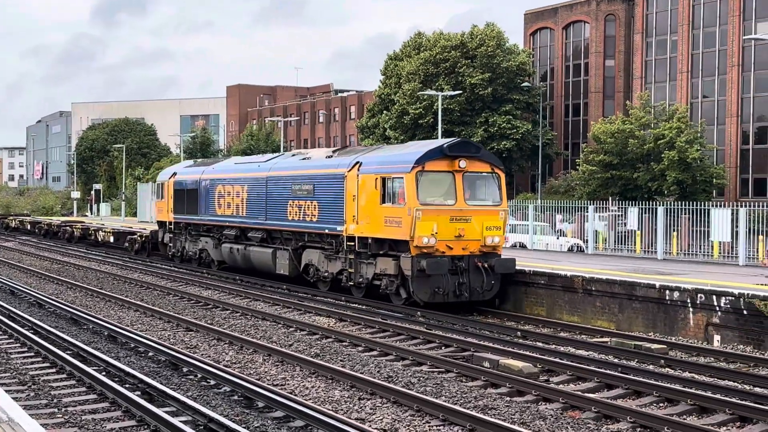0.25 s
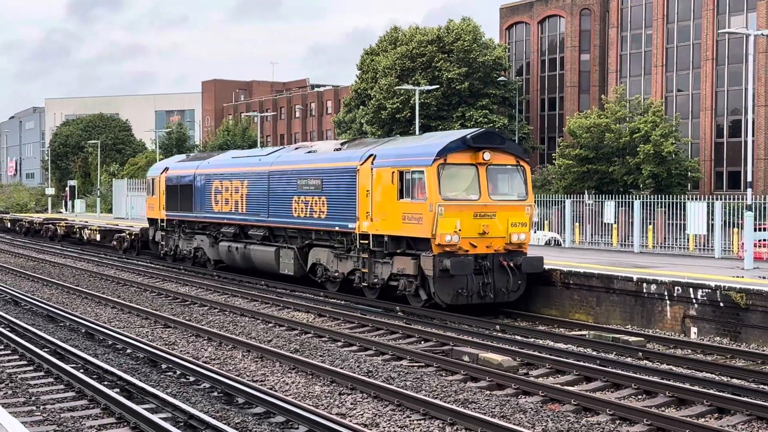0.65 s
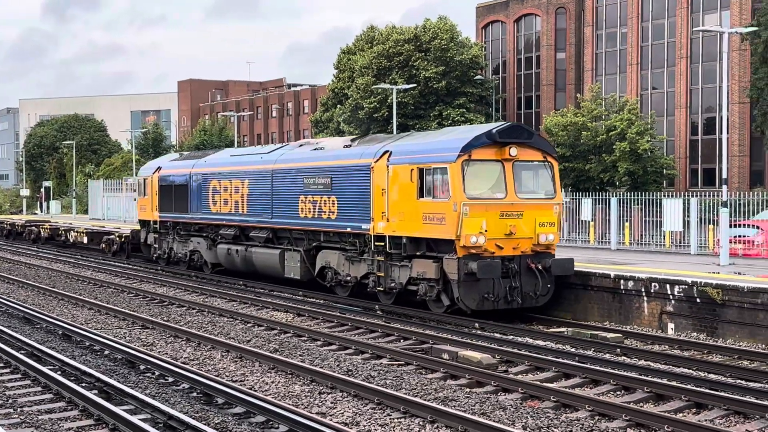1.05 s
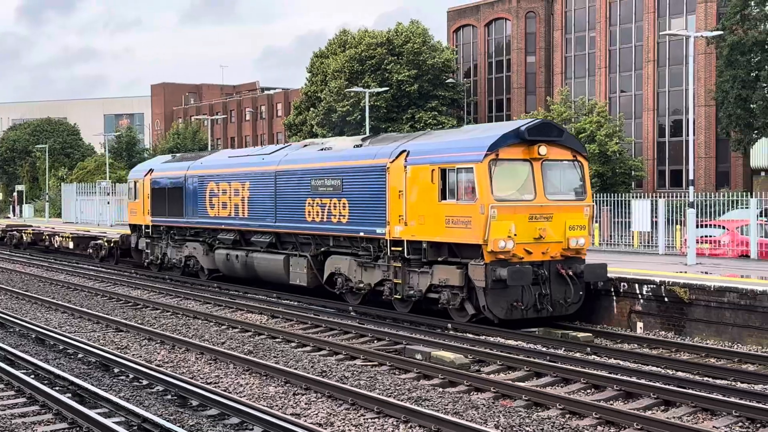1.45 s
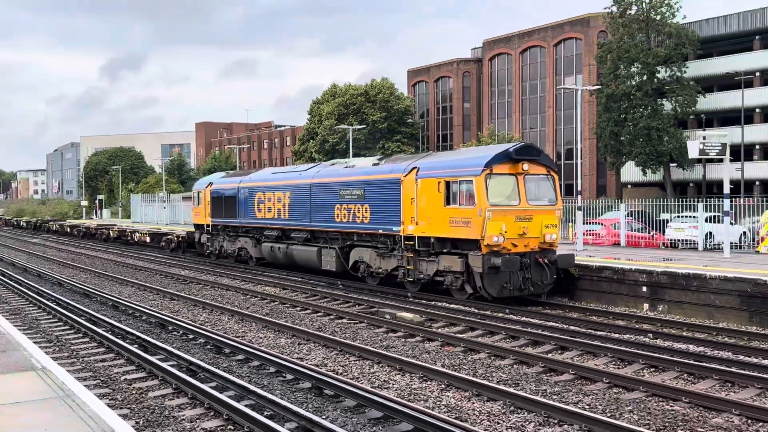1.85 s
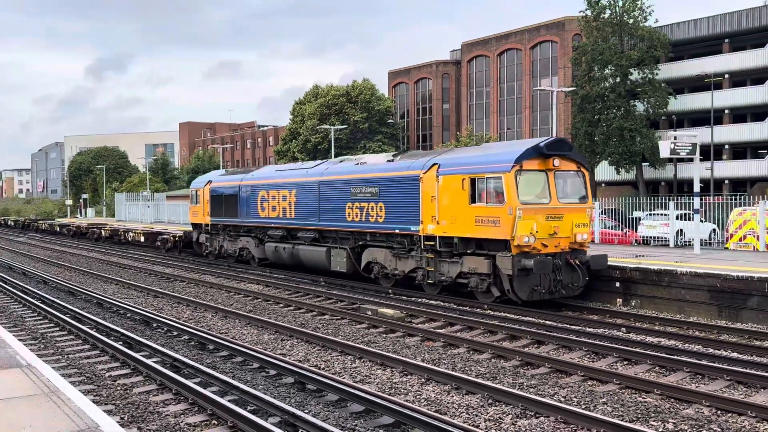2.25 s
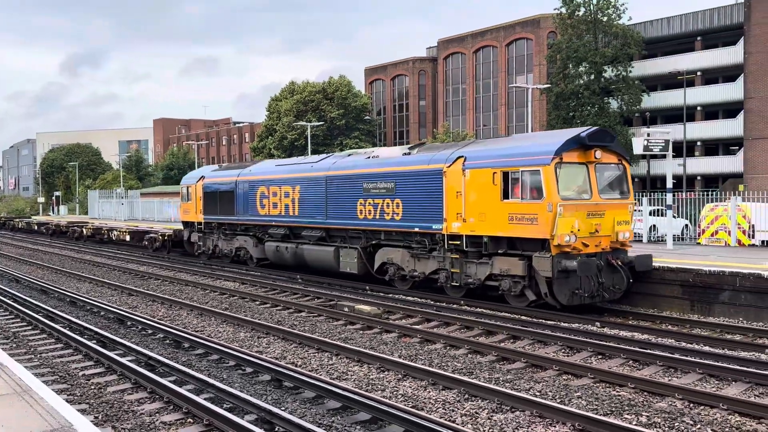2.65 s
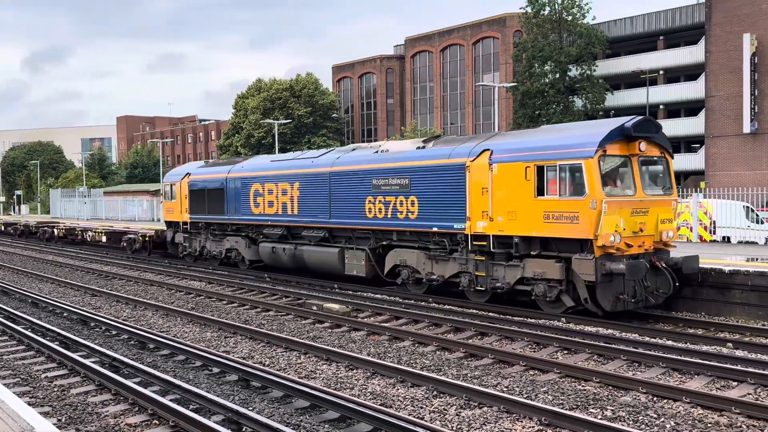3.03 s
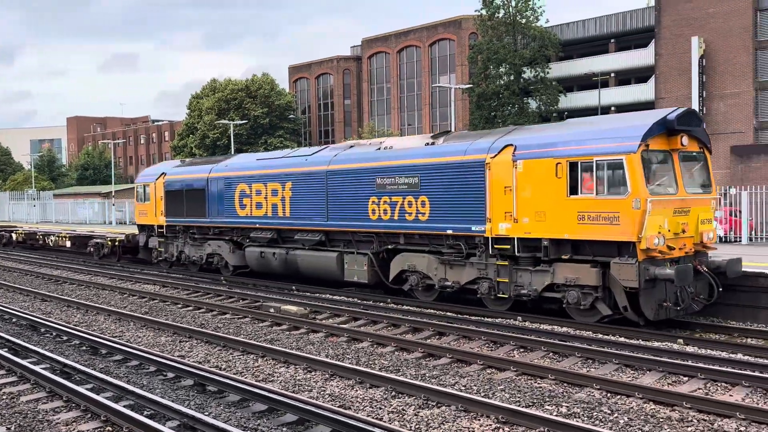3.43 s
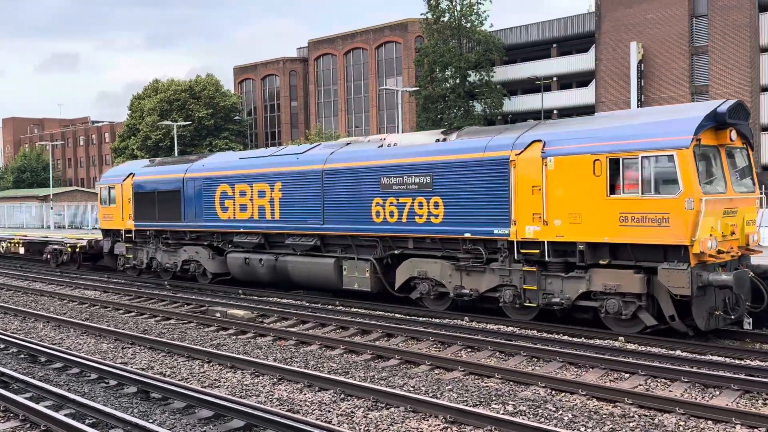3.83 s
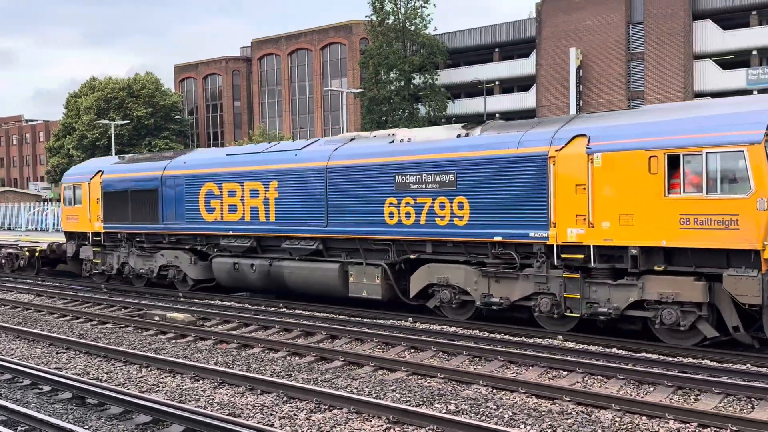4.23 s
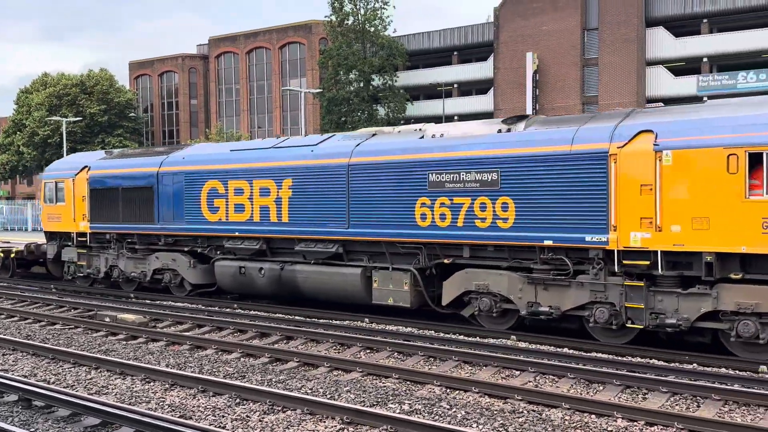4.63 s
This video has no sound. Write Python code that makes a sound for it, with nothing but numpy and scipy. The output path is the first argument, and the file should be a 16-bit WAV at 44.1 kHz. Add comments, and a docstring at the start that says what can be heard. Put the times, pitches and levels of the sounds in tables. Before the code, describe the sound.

A big diesel locomotive rolls slowly toward a microphone on an open station platform, a few tracks away. From 0 s there is a deep, steady exhaust throb, about nine soft thumps a second, bedded in a dark, broad roar of fans and exhaust air. Brief, thin metallic chirps, like a dry rubbing part, squeak irregularly on top. Around 1 s a low gear hum swells in; it comes and goes in uneven surges, strongest from about 2.4 s, and its pitch creeps upward. Fluttering mid-range gear whines and a rattly casing drone thicken from about 1.4 s. After 3 s the chirps include more of the higher squeaks, short singing gear notes appear, especially after 4 s, and a rough, faint blower whistle emerges. Clatter and light hiss increase as the engine room nears. The sound is fullest at the end, near 4.9 s, still running when it stops. The image is nearly central.

```python
"""A two-stroke V12 diesel locomotive idles toward a platform, a few tracks away.
First: exhaust throb on crankshaft orders, noise-band air roar, chirps from a part that rubs as it turns.
From about 1 s a traction gear tone swells in, climbing slowly; fluttering engine-gear harmonics follow.
From about 3 s the 4th gear harmonic sings in short notes, then a blower whistle stands out.
Most layers grow to the end as the engine room draws near; faint top-band noise is uneven in level."""
import sys
import numpy as np
from scipy import signal
from scipy.fft import rfft, irfft
from scipy.io import wavfile

SR = 44100
rng = np.random.default_rng(int(sys.argv[2]) if len(sys.argv) > 2 else 0)


def output_pcm(signal):
    """Save a mono or channel-first signal as 16-bit PCM at the path in sys.argv[1].

    Samples are clipped to [-1, 1] before scaling.
    """
    pcm = np.clip(np.atleast_2d(signal).T, -1, 1) * 32767
    wavfile.write(sys.argv[1], SR, np.round(pcm).astype(np.int16))


N = 215405
TIME = np.arange(N) / SR
FREQS = np.fft.rfftfreq(N, 1 / SR)

SPEED_M_S, TRACK_M, ABREAST_S = 5.5, 7.9, 5.4  # approach, distance to the track, engine room level
GRILLE_POWER = 1.93  # side grilles face sideways: their sound grows as nearness to this power
CRANK_HZ, CRANK_SAG_HZ_PER_S, CRANK_AT_S = 4.523, .0026, 2.8  # crank rate at CRANK_AT_S, and its fall
THUMP_S = .0375  # a thump falls about here
CHIRP_RATE_HZ, CHIRP_CREST_S = 6.18, 2.1
WHISTLE_HZ, WHINE_HZ = 4254, 357.7
CASING_HZ, CASING_WIDTH_HZ = 706, 26
MESH_HZ, MESH_RISE_HZ_PER_S = 226.8, 4.45
TOP_HZ = 15600

# Rubbing tones. Each row: frequency in Hz, far and near level in dB before the rub trim.
RUB_TONES = [(2330, -64, -65), (3712, -67, -60), (4616, -67.5, -64)]
# Loudest chirps. Each row: time in seconds, frequency in Hz, level in dB before the bite trim, length in seconds.
BITES = [(0.213, 2336, -44, 0.023), (0.56, 2325, -54, .025), (0.693, 2329, -43, 0.025),
         (0.844, 2335, -40, 0.019), (1.178, 2290, -47, 0.016), (1.31, 2320, -41, 0.014),
         (1.41, 2337, -43, 0.03), (1.457, 2360, -47, 0.018), (1.644, 2325, -40, 0.017),
         (1.823, 2330, -40, 0.026), (2.01, 2338, -51, 0.018), (2.632, 2320, -37, 0.026),
         (2.973, 2310, -55, 0.011), (3.22, 2290, -39, 0.017), (3.344, 2316, -38, 0.033),
         (3.416, 2334, -45, 0.019), (3.57, 2330, -37.5, 0.014), (4.28, 2326, -47, .035),
         (4.36, 2331, -47, .018), (4.517, 2326, -40, .02), (4.707, 2322, -38, 0.033),
         (4.872, 2317, -44, .015), (0.3, 4613, -55, .012), (0.494, 4616, -54, .015),
         (0.804, 4602, -53, .02), (1.004, 4616, -55, 0.02), (1.295, 4618, -55, .02),
         (1.63, 4621, -53, 0.044), (2.45, 4614, -50, .03), (2.593, 4607, -54, .03),
         (2.75, 4617, -49, 0.026), (2.8, 4700, -47, 0.01), (2.93, 4653, -55, .025),
         (3.12, 4613, -41.5, 0.031), (3.243, 4603, -51, .016), (3.37, 4614, -48, 0.023),
         (3.44, 4612, -47, 0.013), (3.56, 4612, -44, 0.024), (3.741, 4647, -48, 0.022),
         (3.809, 4597, -54, .015), (3.882, 4615, -49, .027), (4.08, 4580, -42.5, 0.024),
         (4.212, 4623, -44, 0.02), (4.396, 4680, -50, .028), (4.563, 4540, -55, .014),
         (4.705, 4618, -49, 0.022), (4.875, 4620, -42, 0.022)]
# Blower whistle. Each row: time in seconds, level in dB.
WHISTLE_LEVEL_DB = [(0, -69), (1.6, -68), (2.0, -64.5), (2.4, -64.5), (2.7, -66), (3.2, -65), (3.6, -60.5),
                    (4.1, -57), (4.38, -60.5), (4.6, -57), (4.88, -59.5)]
# Steady machinery tones. Each row: frequency in Hz, far and near level in dB,
# flutter as a ratio to the steady part, flutter rate in Hz.
MACHINE_TONES = [(357.7, -47, -46, .4, 10), (407, -57, -45, .6, 10), (433, -54, -44, .9, 15),
                 (543, -54, -44, .6, 10), (1589, -63, -54, .9, 15), (1788, -60, -52.5, .7, 8),
                 (2333, -55, -53.5, .7, 50), (2685, -75, -61, 1.5, 40), (3185, -69, -59.5, 1, 30),
                 (4612, -65.5, -60.5, 1.3, 60)]
# Engine gear harmonics 2, 3 and 4, in lobes that sweep past. Each row: time in seconds, level in dB.
WHINE_2_DB = [(0, -56), (.9, -51), (1.4, -45), (2.3, -41.5), (2.7, -45), (3.0, -41), (3.4, -41),
              (4.3, -40.5), (4.65, -38.5), (4.88, -41)]
WHINE_3_DB = [(0, -56), (.7, -51), (1.1, -52), (1.8, -47), (2.3, -46), (2.8, -46.5), (3.48, -49.5),
              (3.56, -41), (3.9, -41), (4.08, -44), (4.16, -53), (4.55, -51), (4.66, -42.5), (4.88, -42)]
WHINE_4_DB = [(0, -56), (2.7, -55), (3.5, -55.5), (3.95, -54), (4.23, -52.5), (4.7, -52), (4.88, -53)]
# Backlash roughness. Each row: harmonic number, flutter as a ratio to the steady part, flutter rate in Hz.
GEAR_BACKLASH = [(2, .5, 14), (3, .22, 14), (4, .3, 24)]
# Short notes of the 4th harmonic. Each row: time in seconds, level in dB, length in seconds.
SUNG_NOTES = [(1.293, -53, .03), (2.93, -50, .04), (3.235, -48.5, .03), (3.873, -53, .02),
              (4.052, -42.5, .037), (4.23, -45.5, .04), (4.37, -45, .052), (4.53, -46, .05),
              (4.716, -42.5, .032)]
# Casing drone. Each row: time in seconds, level in dB.
CASING_LEVEL_DB = [(0, -55), (1.0, -51), (1.4, -44.5), (2.6, -43.5), (3.1, -40.5), (4.88, -40.5)]
# Traction gear hum. Each row: time in seconds, level in dB.
MESH_LEVEL_DB = [(0, -44.5), (.65, -45.5), (.95, -37), (1.25, -41.5), (1.5, -46), (1.8, -39.5),
                 (2.08, -37.5), (2.2, -41), (2.41, -29.5), (2.54, -37), (2.65, -35.5), (2.76, -39.5),
                 (2.88, -34), (3.12, -36.5), (3.45, -30.5), (3.66, -28.5), (3.8, -35), (3.95, -27.5),
                 (4.15, -34), (4.32, -28), (4.55, -39.5), (4.8, -34)]
# Noise colours: roof roar, side-grille roar, clatter, hiss, top band.
# Each row: frequency in Hz, relative density in dB per Hz.
ROOF_COLOUR = [(22, -31), (35, -6), (70, 7), (110, 2), (150, -2.5), (200, 1.5), (245, 2), (300, -1.5),
               (380, -2), (470, -1), (600, -3), (690, -2), (900, -6), (1100, -9), (1600, -24.5),
               (3000, -65)]
SIDE_COLOUR = [(22, -24), (35, -5), (75, 6), (115, 2.5), (160, 0), (200, 2), (245, 2.5), (310, 0),
               (370, -3.5), (430, 0.5), (520, 1), (660, 2.1), (790, -6.5), (1100, -15.5), (1600, -30.5),
               (3000, -59)]
CLATTER_COLOUR = [(500, -41), (900, 1.5), (1200, 4.5), (1550, 3), (1900, 0), (2400, -3), (3000, -5.5),
                  (4000, -10), (5000, -20.5), (7000, -44)]
HISS_COLOUR = [(2500, -27.5), (4200, 6.5), (5200, 2.5), (7000, 2.5), (8300, -2.5), (9400, -2), (10300, 0),
               (12000, -14.5), (14000, -36)]
TOP_BAND_COLOUR = [(9000, -19), (11500, 6.5), (14300, -4.5), (15600, -14)]
# Top-band noise. Each row: time in seconds, level in dB.
TOP_BAND_LEVEL_DB = [(0, -70), (.3, -70), (.44, -68), (.75, -74), (1.2, -79), (2.0, -73.5), (3.05, -77),
                     (3.35, -69), (3.52, -72), (3.7, -67), (3.98, -73), (4.15, -67), (4.6, -70),
                     (4.88, -67)]
# Diffuse share of the air noise. Each row: frequency in Hz, side minus mid in dB.
AIR_WIDTH = [(60, -20.5), (110, -17), (200, -14), (400, -13), (700, -8.5), (1300, -6.5), (2300, -27),
             (3300, -41), (5300, -51), (9000, -56), (14000, 0)]
# Weaker exhaust orders. Each row: multiple of the crank rate, far and near level in dB.
RUMBLE_ORDERS = [(6, -52, -47), (7, -57, -52), (10, -43, -44), (12, -52, -51), (13, -54, -51),
                 (14, -46, -50), (16, -55, -42), (18, -48, -40), (19, -47, -40.5), (22, -56, -55),
                 (23, -54, -53), (24, -56, -53), (26, -52, -49), (30, -49, -47), (32, -53, -52),
                 (33, -56, -52), (36, -51, -52), (38, -53, -53), (39, -54, -46)]
# Orders beating with the 9th and 15th twice a turn. Each row: multiple of the crank rate, far and near level in dB.
THROB_ORDERS = [(11, -36.8, -38.5), (13, -40, -80), (17, -39, -37.5)]
# Deep 9th exhaust order. Each row: time in seconds, level in dB.
ORDER_9_DB = [(0, -38), (0.35, -37), (0.8, -31.5), (2.0, -35), (3.4, -33.5), (4.4, -27), (4.88, -29)]
# Strongest exhaust order, the 15th; dips where an echo cancels it. Each row: time in seconds, level in dB.
ORDER_15_DB = [(0, -29), (.25, -28), (.5, -33.5), (.92, -26.5), (1.45, -25), (1.62, -23.3), (2.0, -23),
               (2.3, -21.8), (2.7, -24), (3.08, -25.5), (3.21, -34.5), (3.4, -28), (3.64, -24), (3.8, -26),
               (4.0, -23.3), (4.3, -24.3), (4.66, -26), (4.76, -31), (4.88, -25)]
# Two microphone ports. Each row: frequency in Hz, left lead in radians, left minus right in dB.
MIC_PORTS = [(300, 0, .5), (700, .15, 1.7), (1200, -.4, 1.1), (2000, 0, 0), (3000, .4, 0), (4650, .28, 0),
             (5300, 0, 0), (6200, 0, 0), (6700, .45, 0), (7250, 1.25, 0), (7550, 2, 0), (7750, 3.05, 0),
             (9000, 3.12, 0), (9300, 2.75, 0), (9800, 2.5, 0), (10400, 2.2, 0), (12200, 1.7, 0),
             (14600, .3, 0)]


def undb(db):
    """Decibels to gain."""
    return 10 ** (np.asarray(db) / 20)


def unit(x):
    """Scale to rms 1."""
    return x / np.sqrt(np.mean(np.abs(x) ** 2))


def curves(table):
    """Columns of a time table, one value a sample."""
    s, *columns = np.transpose(table)
    return [np.interp(TIME, s, c) for c in columns]


def spectra(table):
    """Columns of a frequency table, one value a bin, on a log frequency axis."""
    hz, *columns = np.transpose(table)
    return [np.interp(np.log(FREQS + 1), np.log(hz), c) for c in columns]


def noise(gain):
    """Noise of rms 1 with the given gain per bin."""
    return unit(irfft(rfft(rng.standard_normal(N)) * gain, N))


def walk(rate_hz):
    """Smooth random signal of rms 1, changing about rate_hz times a second."""
    return noise(1 / (1 + (FREQS / rate_hz) ** 2))


def stereo(mid, side):
    """Left and right from mid and side."""
    return np.array([mid + side, mid - side])


def bump(s, db, length_s):
    """Short smooth rise and fall of gain."""
    return undb(db) * np.exp(-((TIME - s) / length_s) ** 2)


def nearness():
    """0 at the start to 1 at the closest; follows the log of distance, as level does."""
    closeness = -np.log(np.hypot(TRACK_M, SPEED_M_S * (TIME - ABREAST_S)))
    return (closeness - closeness.min()) / np.ptp(closeness)


def approach(near, far_db, near_db):
    """Gain that goes from far level to near level."""
    return undb(far_db + near * (near_db - far_db))


def tone(hz, flutter, flutter_hz, side_db):
    """Tone of rms near 1: steady direct part plus fluttering reflections from house fronts."""
    carrier = np.exp(2j * np.pi * np.cumsum(hz * np.ones(N)) / SR)
    mid, side = (unit(walk(flutter_hz) + 1j * walk(flutter_hz)) for _ in range(2))
    envelope = stereo(unit(1 + flutter * mid), undb(side_db) * side)
    return np.sqrt(2) * np.real(carrier * envelope)


def air(colour):
    """Stereo noise of the given colour, mid of rms 1, partly diffuse."""
    gain, width = undb(spectra(colour)[0]), undb(spectra(AIR_WIDTH)[0])
    share = np.sqrt(np.sum((gain * width) ** 2) / np.sum(gain ** 2))
    return stereo(noise(gain), share * noise(gain * width))


def top_band_noise():
    """Faint top-band noise, level uneven."""
    return air(TOP_BAND_COLOUR) * undb(curves(TOP_BAND_LEVEL_DB)[0])


def chirping(near, rub_db=2.5, bite_db=-4.8):
    """A part rubs once a turn and rings high; now and then it bites harder."""
    turn = np.cos(2 * np.pi * CHIRP_RATE_HZ * (TIME - CHIRP_CREST_S))
    rub = unit(1 + (.25 + .45 * near) * turn)
    ring = sum(approach(near, far_db, near_db) * tone(hz, flutter=6.1, flutter_hz=40, side_db=-36)
               for hz, far_db, near_db in RUB_TONES)
    waver_turns = np.cumsum(18 * walk(60)) / SR  # pitch wavers by 18 Hz rms
    bites = np.sqrt(2) * sum(bump(s, db, length_s) * np.sin(2 * np.pi * (hz * TIME + waver_turns))
                             for s, hz, db, length_s in BITES)
    return undb(rub_db) * rub * ring + undb(bite_db) * bites


def whistle():
    """Rough blower whistle that comes out as the side grilles draw near."""
    return undb(curves(WHISTLE_LEVEL_DB)[0]) * tone(WHISTLE_HZ, flutter=.8, flutter_hz=45, side_db=-24)


def machine_tones(near):
    """Steady machinery tones, among them the 1st and 5th engine gear harmonics."""
    return sum(approach(near, far_db, near_db) * tone(hz, flutter, flutter_hz, side_db=-34.5)
               for hz, far_db, near_db, flutter, flutter_hz in MACHINE_TONES)


def engine_gears():
    """Tooth harmonics 2 to 4 of the engine's gear train, rough with backlash."""
    second, third, fourth = (undb(curves(level)[0]) for level in (WHINE_2_DB, WHINE_3_DB, WHINE_4_DB))
    fourth = fourth + sum(bump(*note) for note in SUNG_NOTES)
    return sum(gain * tone(k * WHINE_HZ, flutter, flutter_hz, side_db=-18)
               for gain, (k, flutter, flutter_hz) in zip((second, third, fourth), GEAR_BACKLASH))


def casing(turns, side_db=-13):
    """The same rattle recurs every crank turn and keeps a casing resonance droning."""
    size = int(SR / CRANK_HZ)
    resonance = 1 / (1 + (2 * (FREQS - CASING_HZ) / CASING_WIDTH_HZ) ** 2)
    one_turn = rng.standard_normal((2, size))
    rattles = one_turn[:, (turns * size).astype(int) % size]
    mid, side = (unit(irfft(rfft(rattle) * resonance, N)) for rattle in rattles)
    return undb(curves(CASING_LEVEL_DB)[0]) * stereo(mid, undb(side_db) * side)


def traction_gear(half_db=-44.5):
    """Axle gear hums upward in swells as the train gathers speed, with a weak tone an octave below."""
    hz = MESH_HZ + MESH_RISE_HZ_PER_S * TIME
    db = curves(MESH_LEVEL_DB)[0]
    mesh = undb(db) * tone(hz, flutter=.06, flutter_hz=15, side_db=-22.5)
    octave_db = half_db + .5 * (db - db.mean())  # swells half as deep in dB
    return mesh + undb(octave_db) * tone(hz / 2, flutter=.2, flutter_hz=8, side_db=-15.5)


def fan_and_gas(turns, near, grille):
    """Fan and exhaust gas noise, puffing with twelve firings a turn and the twice-a-turn thump."""
    firing = np.cos(2 * np.pi * 12 * turns)
    thump = np.cos(4 * np.pi * turns)
    # side grilles come into view and fill out the middle of the roar
    roof = air(ROOF_COLOUR) * np.sqrt(1 - .9 * grille) * approach(near, far_db=-34, near_db=-30.5)
    sides = air(SIDE_COLOUR) * approach(near, far_db=-42.5, near_db=-26)
    roar = (roof + sides) * undb(.43 * walk(23)) * (1 + .016 * firing + .019 * thump)
    clatter = air(CLATTER_COLOUR) * approach(grille, far_db=-42.5, near_db=-38)
    clatter = clatter * undb(1.03 * walk(30)) * (1 + .037 * firing)
    hiss = air(HISS_COLOUR) * approach(grille, far_db=-56.5, near_db=-50.5)
    hiss = hiss * undb(.77 * walk(23)) * (1 + .03 * thump)
    return roar + clatter + hiss


def exhaust(turns, near):
    """Unevenly spaced firings favour odd crank orders, which line up into two thumps a turn."""
    def order(k, phase_cycles):
        return np.sqrt(2) * np.cos(2 * np.pi * (round(k) * turns + phase_cycles))

    lead_cycles = 3 / 8  # shared, so the strong orders line up
    strong = undb(curves(ORDER_9_DB)[0]) * order(9, lead_cycles)
    strong = strong + undb(curves(ORDER_15_DB)[0]) * order(15, lead_cycles)
    throb = sum(approach(near, far_db, near_db) * order(k, lead_cycles)
                for k, far_db, near_db in THROB_ORDERS)
    # as the engine moves, echoes shift the phase of the weaker orders
    rumble = sum(approach(near, far_db, near_db) * order(k, rng.random() + .1 * walk(.88))
                 for k, far_db, near_db in RUMBLE_ORDERS)
    return strong + throb + rumble


def scene():
    """Most sources ride on the locomotive; hiss, clatter and chirps swell late, as the grilles face sideways."""
    # Doppler lift of the crank rate wanes as the locomotive draws level
    turns = CRANK_HZ * (TIME - THUMP_S) - .5 * CRANK_SAG_HZ_PER_S * (TIME - CRANK_AT_S) ** 2
    near = nearness()
    grille = near ** GRILLE_POWER
    high = top_band_noise() + chirping(grille) + whistle()
    gears = machine_tones(near) + engine_gears() + casing(turns) + traction_gear()
    return high + gears + fan_and_gas(turns, near, grille) + exhaust(turns, near)


def record(dry):
    """Two microphone ports differ in phase and level; a steep low-pass cuts the top."""
    lead_rad, balance_db = spectra(MIC_PORTS)
    port = undb(balance_db / 2) * np.exp(.5j * lead_rad)
    fade = np.minimum(1, np.minimum(TIME, TIME[::-1]) / .003)  # 3 ms at both ends
    heard = irfft(rfft(dry * fade) * np.array([port, 1 / port]), N)
    return signal.sosfilt(signal.ellip(8, .2, 70, TOP_HZ, fs=SR, output="sos"), heard)


dry = scene()
out = record(dry)
output_pcm(out)
```